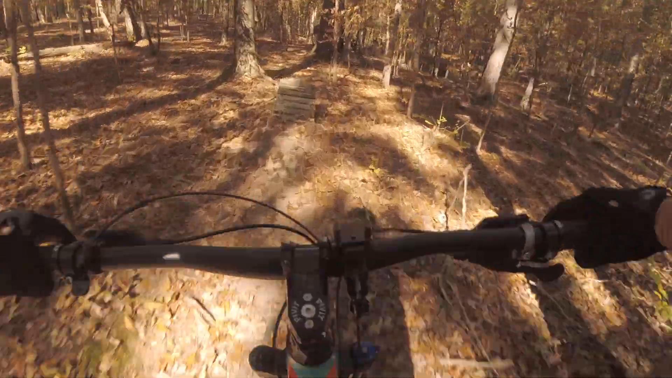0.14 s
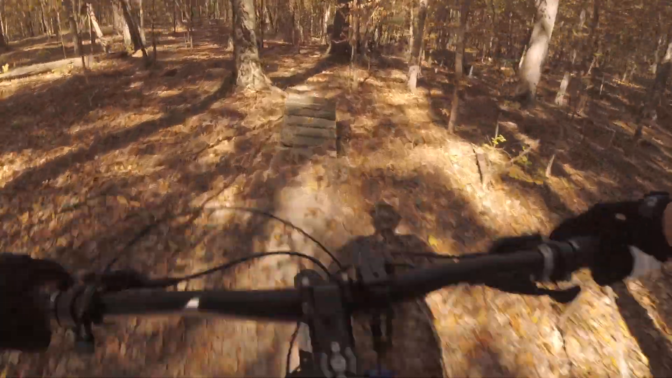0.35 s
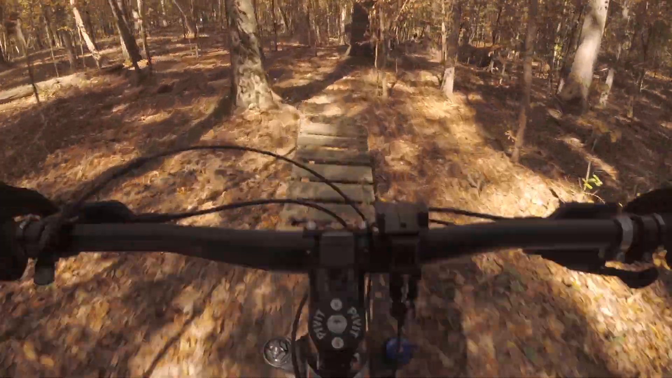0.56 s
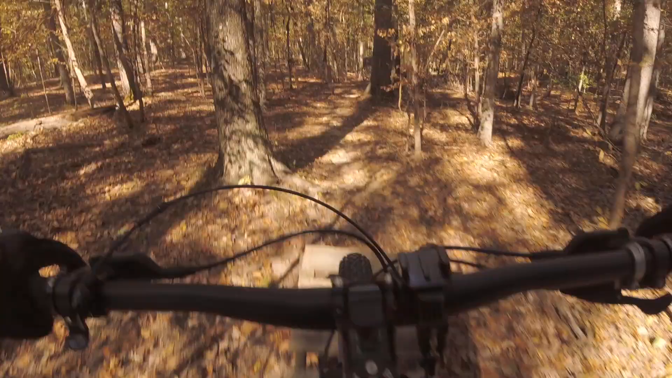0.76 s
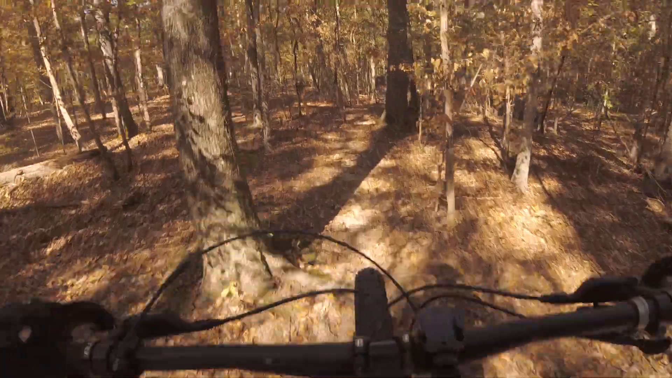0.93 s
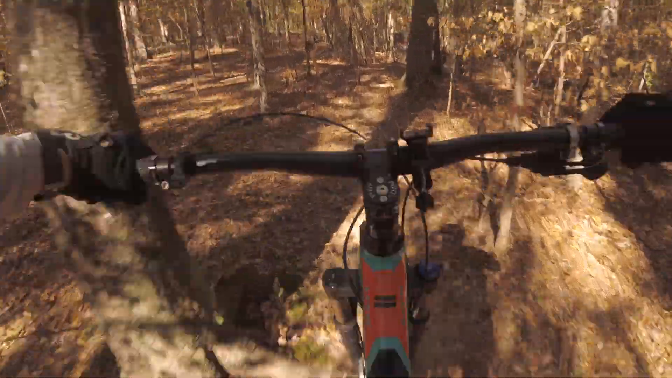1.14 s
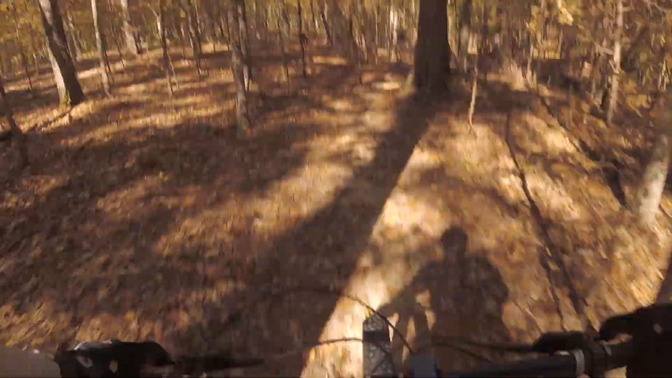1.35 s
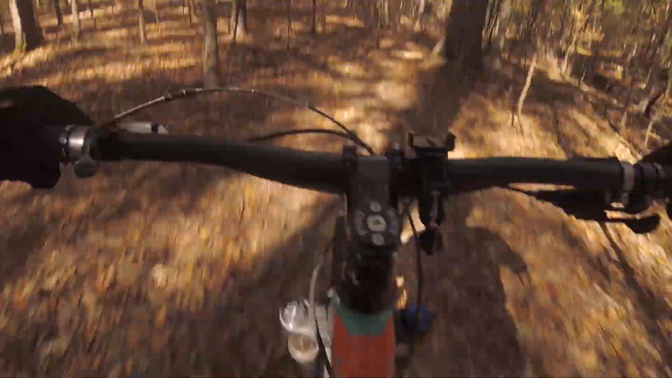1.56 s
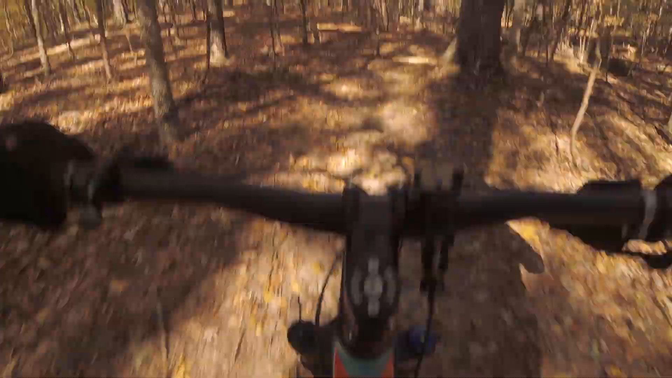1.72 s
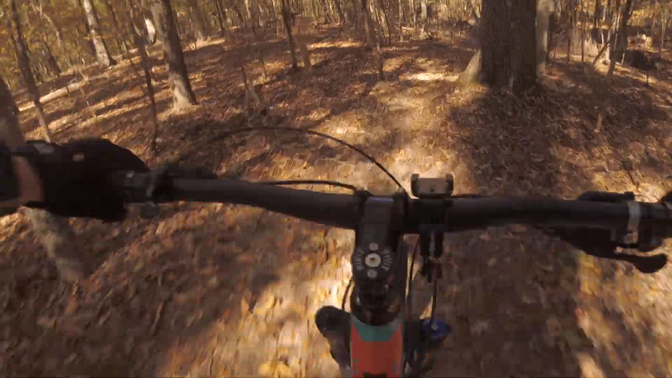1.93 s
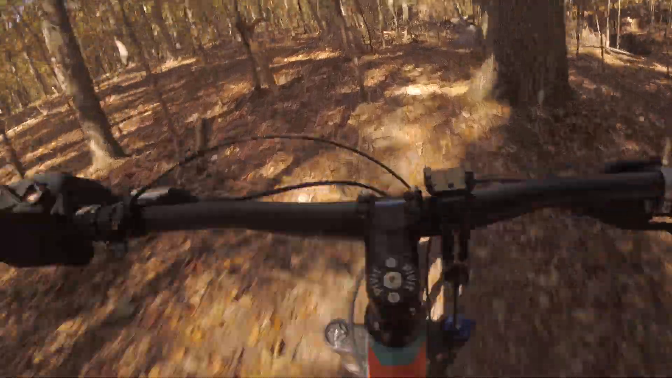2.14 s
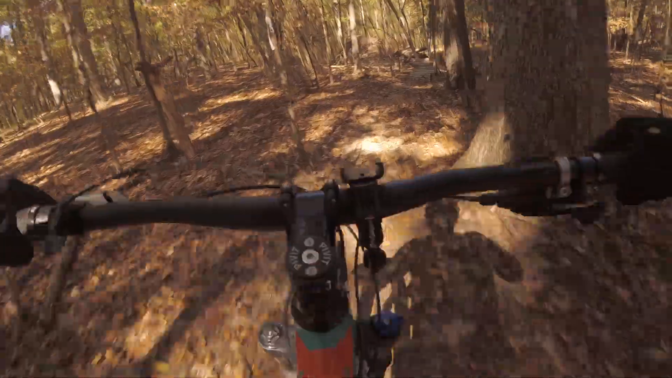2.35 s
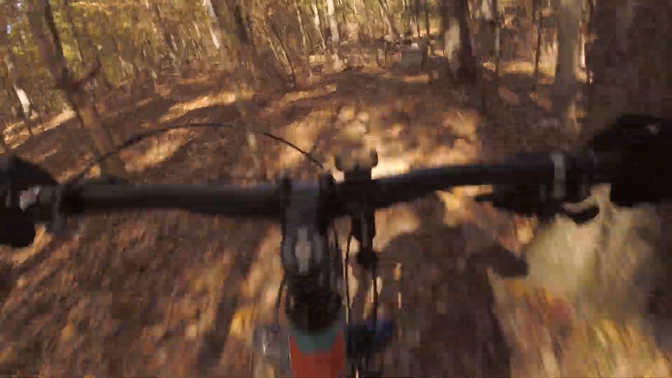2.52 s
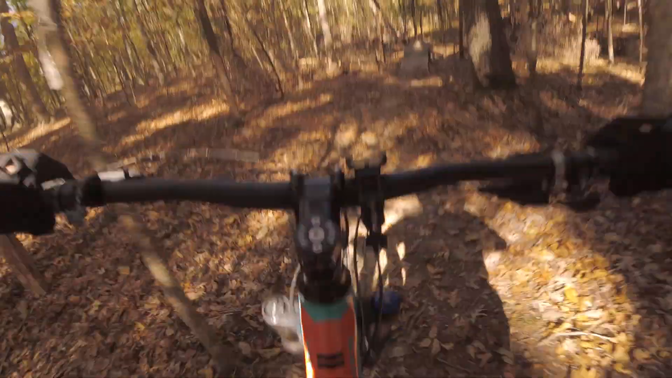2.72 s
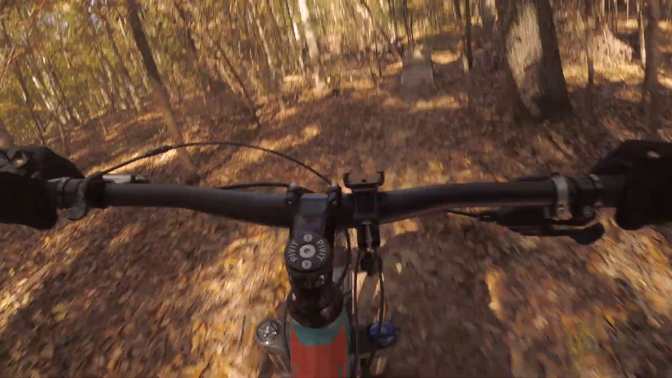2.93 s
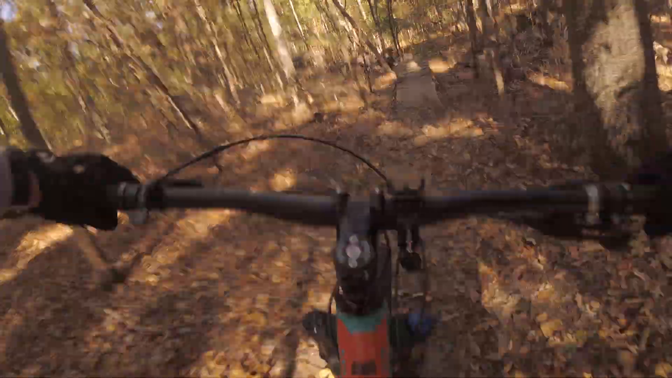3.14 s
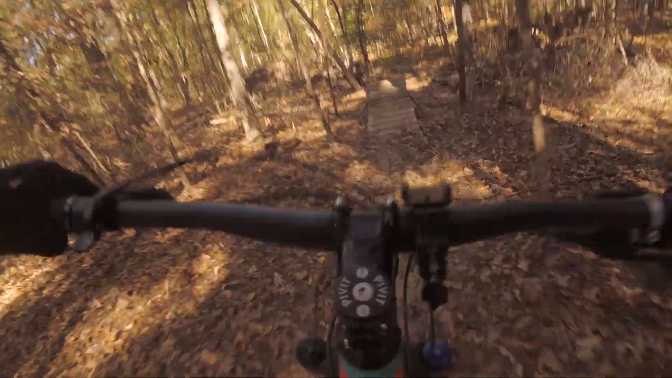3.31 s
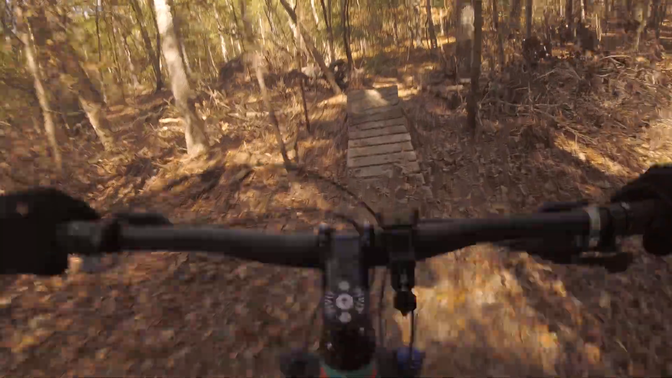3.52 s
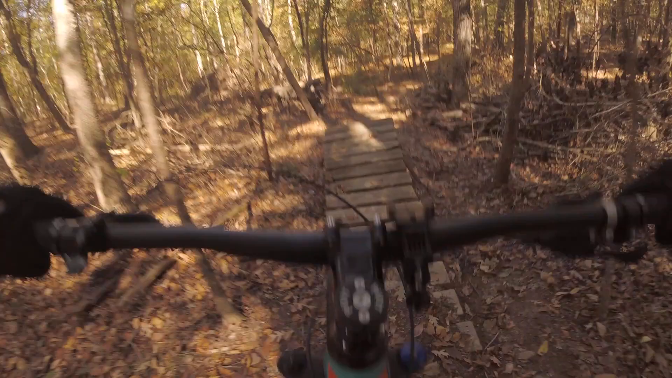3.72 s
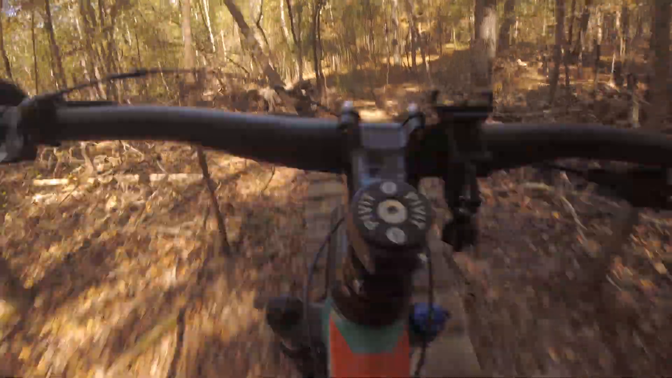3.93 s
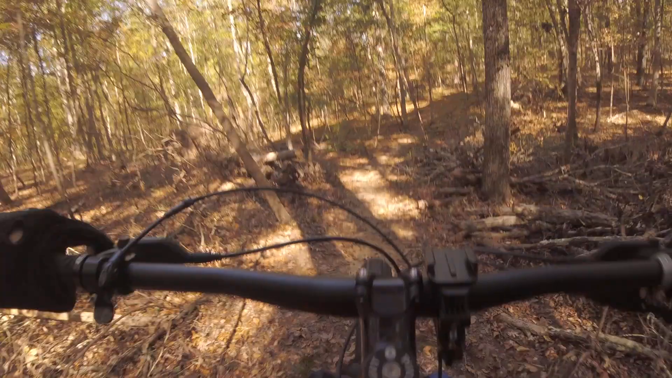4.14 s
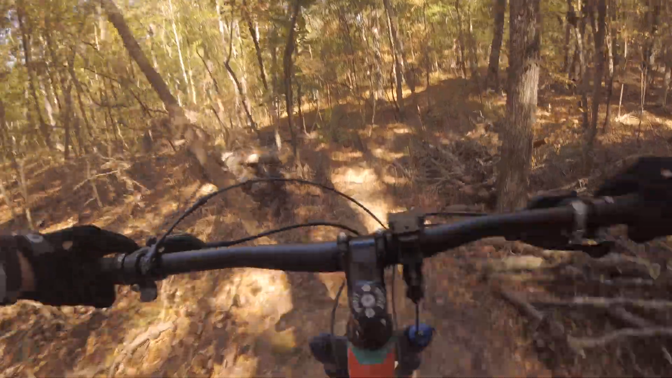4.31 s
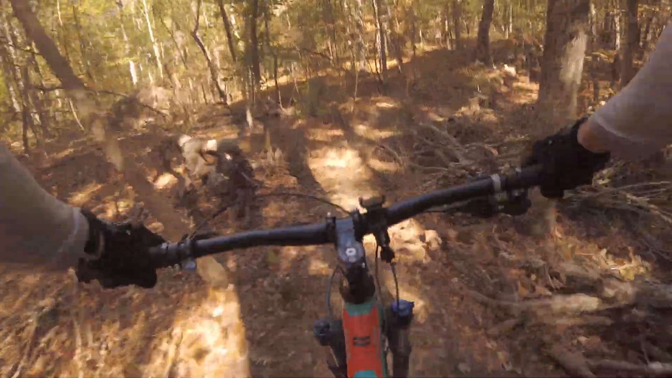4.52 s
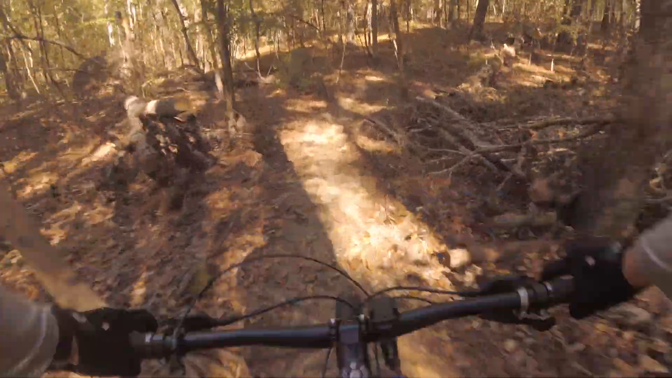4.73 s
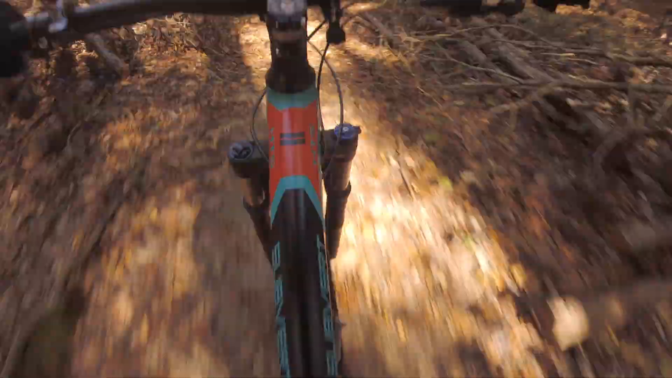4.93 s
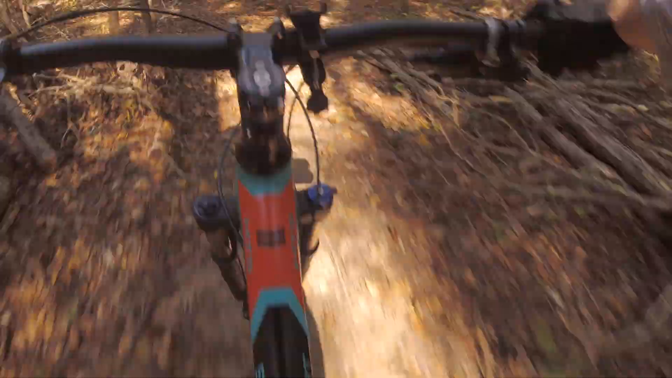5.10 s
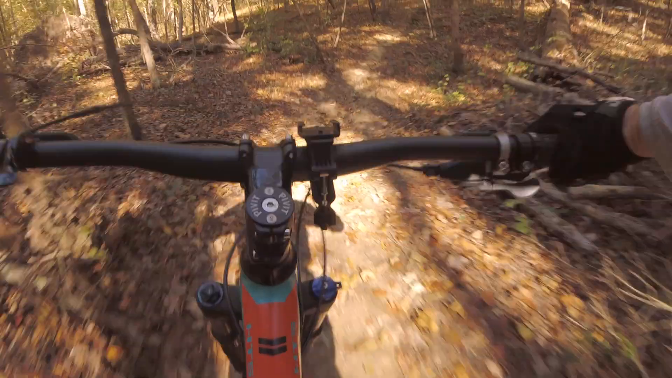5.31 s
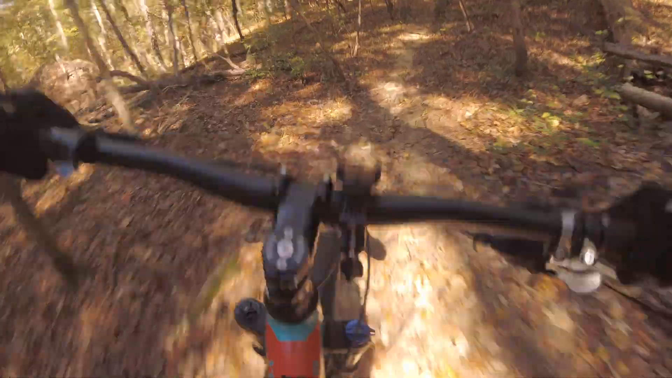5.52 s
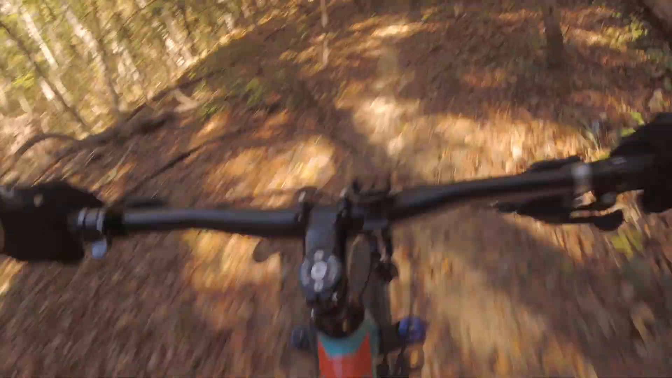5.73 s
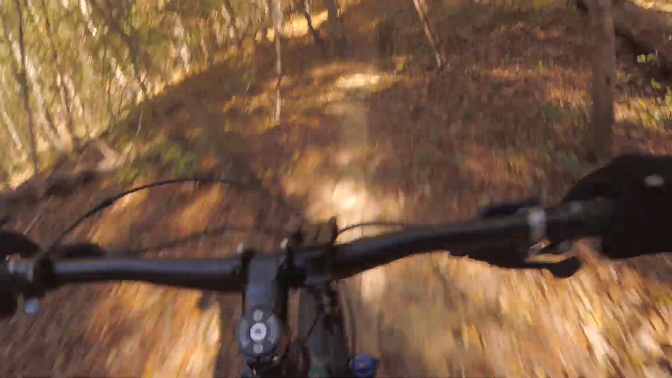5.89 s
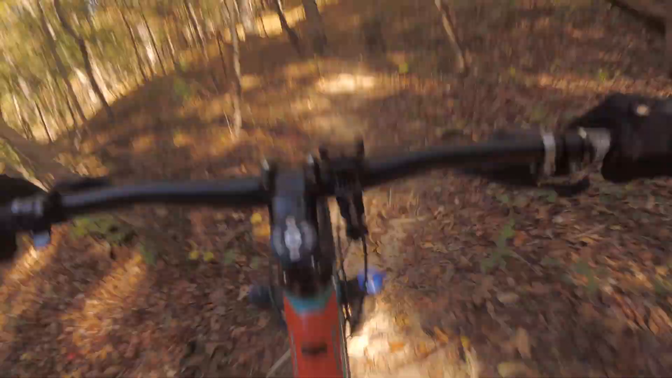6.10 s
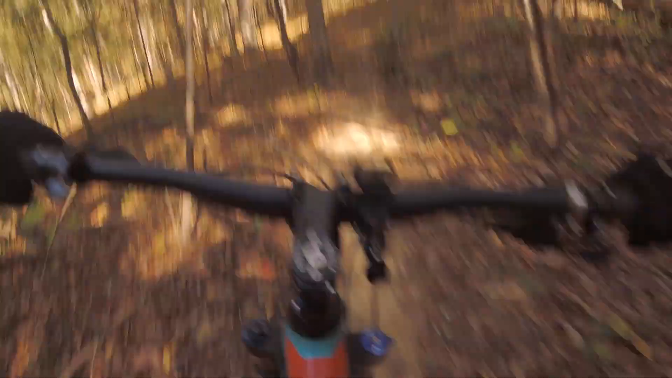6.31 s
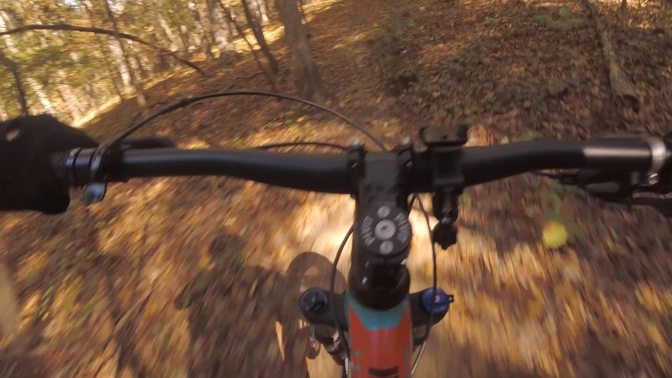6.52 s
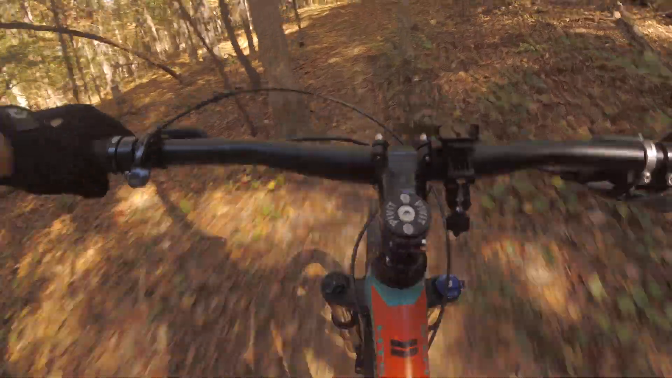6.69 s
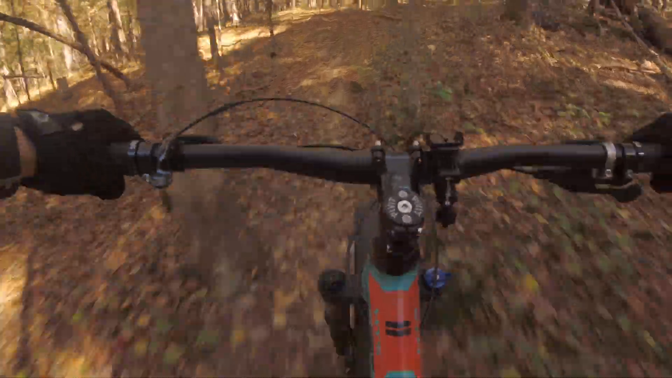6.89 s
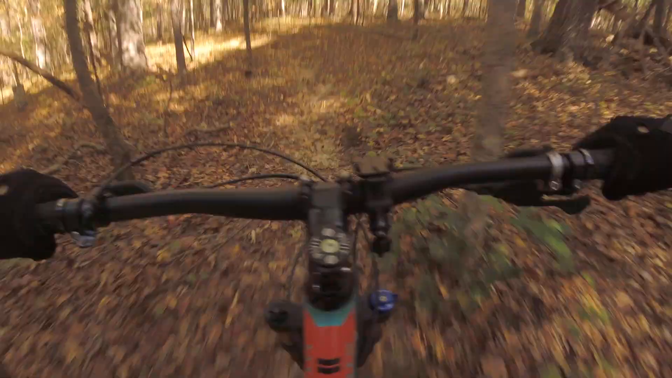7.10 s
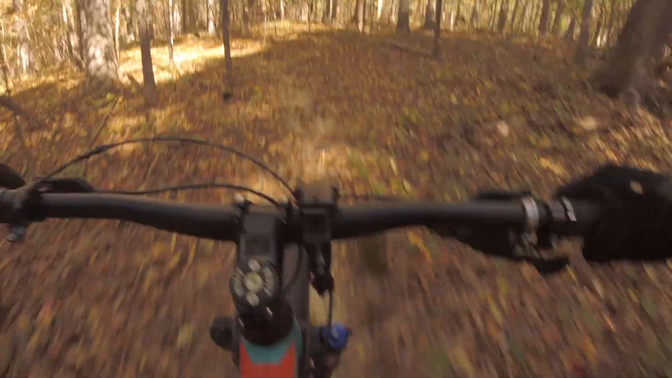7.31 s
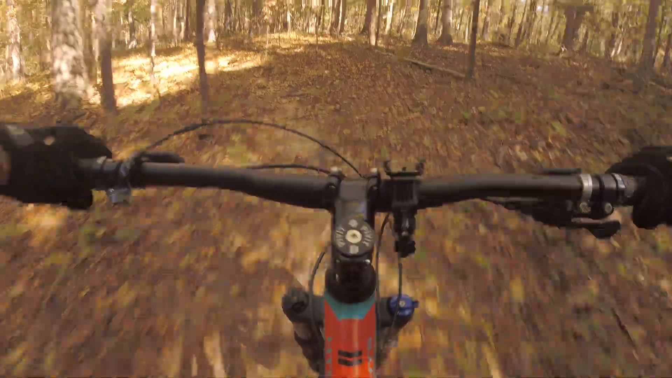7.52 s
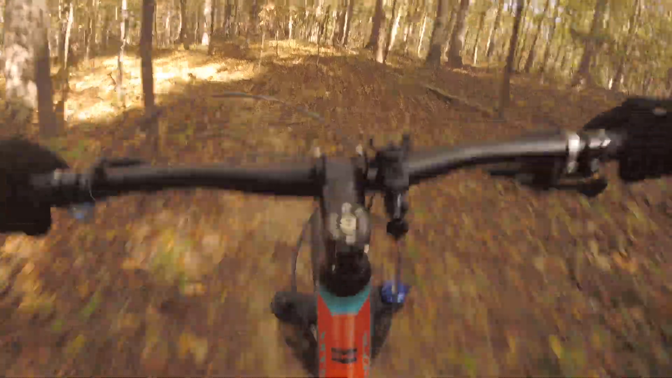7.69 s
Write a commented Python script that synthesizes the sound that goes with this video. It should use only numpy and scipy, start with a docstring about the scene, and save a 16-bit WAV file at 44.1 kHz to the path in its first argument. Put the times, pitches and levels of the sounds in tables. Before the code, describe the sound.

A mountain bike coasts down a leafy forest trail, heard close from the rider's chest. Tyres drum and crush dry leaves while cables and frame rattle over low wind rumble. It crosses a hollow wooden ramp and lands with a thud and chain clink; later a second ramp leads to a longer airborne lull with freewheel ticking, then a heavy wind-blasted landing and more rough rolling.

```python
"""Low wind rumble and a frame rattle open the scene, over tyres drumming and crushing dry leaves.
A mountain bike coasts fast along a leafy trail and two small wooden jumps, heard from the rider's chest.
Wind is shaped noise that overloads the capsule; tyres, leaves and planks are contact-grained noise;
blows ring struck parts. In the air the ground noise fades and leaves the freewheel ticks bare."""
import sys
import numpy as np
from scipy import signal
from scipy.fft import rfft, irfft, next_fast_len
from scipy.io import wavfile
from scipy.ndimage import uniform_filter1d, map_coordinates

SR = 44100
rng = np.random.default_rng(int(sys.argv[2]) if len(sys.argv) > 2 else 0)


def output_pcm(signal):
    """Save a mono or channel-first signal as 16-bit PCM at the path in sys.argv[1].

    Samples are clipped to [-1, 1] before scaling.
    """
    pcm = np.clip(np.atleast_2d(signal).T, -1, 1) * 32767
    wavfile.write(sys.argv[1], SR, np.round(pcm).astype(np.int16))


N = 341775


def amp(db):
    """dB to gain."""
    return 10 ** (np.asarray(db) / 20)


def unit(x):
    """Scaled to rms 1."""
    return x / np.sqrt(np.mean(x ** 2) + 1e-20)


def curves(rows):
    """One value per sample for each column after the time."""
    s, *cols = np.transpose(rows)
    return [np.interp(np.arange(N) / SR, s, c) for c in cols]


def wobble(rate_hz):
    """A smooth random curve, rate_hz knots a second."""
    knots = rng.standard_normal(int(N * rate_hz / SR) + 4)
    return map_coordinates(knots, [np.arange(N) * rate_hz / SR])


def filtered(x, response):
    """x times a response of frequency."""
    m = next_fast_len(N + SR // 2)
    return irfft(rfft(x, m) * response(np.fft.rfftfreq(m, 1 / SR)), m)[..., :N]


def coloured(x, points):
    """x through (Hz, dB) points read on a log axis, rms gain 1 for white noise."""
    f, db = np.transpose(points)
    return filtered(x, lambda hz: unit(amp(np.interp(np.log(hz + 0.11), np.log(f), db, -120, -120))))


def resonant(x, modes, top_hz):
    """x, dulled above top_hz, through (Hz, width Hz, dB) resonances; rms 1."""
    def response(f):
        peaks = sum(amp(db) * 1j * f * w / (c * c - f * f + 1j * f * w) for c, w, db in modes)
        return peaks / (1 + 1j * f / top_hz) ** 2
    return unit(filtered(x, response))


def contacts(per_s, spread_db, life_s, share):
    """A gain above 1 that swells at scattered small contacts of uneven, bounded size."""
    size = np.minimum(rng.exponential(size=N), np.e)
    starts = (rng.random(N) < per_s / SR) * amp(spread_db * size)
    fade = [1, -np.exp(-1 / (life_s * SR))]
    swells = signal.lfilter([1], fade, signal.lfilter([1], fade, starts))
    return 1 + share * unit(swells)


def grit(per_s, spread_db, life_s, share):
    """White noise made grainy by contacts; rms 1."""
    return unit(rng.standard_normal(N) * contacts(per_s, spread_db, life_s, share))


def knocks(count, centre_hz, cycles):
    """Small random knocks of twigs and cables, each a few cycles at its own pitch; rms 1."""
    when, pitch = rng.random(count), rng.standard_normal(count)
    size = np.minimum(rng.exponential(size=count), np.e)
    hz, k = centre_hz * np.exp(.25 * pitch)[:, None], np.arange(SR // 50)
    turns = hz * k / SR
    grains = amp(2.2 * size)[:, None] * turns * np.exp(-turns / cycles) * np.sin(2 * np.pi * turns)
    index = (when * N).astype(int)[:, None] + k
    return unit(np.bincount(index.ravel(), grains.ravel(), minlength=N)[:N])


def patchy(x, depth_db):
    """x with random gain in patches some 1 kHz wide and 50 ms long; rms 1."""
    z = signal.stft(x, nperseg=256)[2]
    field = uniform_filter1d(rng.standard_normal(z.shape), size=7, axis=0)
    field = uniform_filter1d(field, size=17, axis=1)
    return unit(signal.istft(z * amp(depth_db * unit(field)), nperseg=256)[1][:N])


def ring(modes, t, detune):
    """One blow on (Hz, dB, t60 s) modes, each at a new strength and slightly off its pitch."""
    return sum(amp(db + rng.normal(0, 1.1) - 60 * t / t60) * np.sin(2 * np.pi * hz * rng.normal(1, detune) * t)
               for hz, db, t60 in modes)


def add(track, s, sound):
    """Mixes a sound in at time s."""
    part = track[max(round(s * SR), 0):][:len(sound)]
    part += sound[:len(part)]


# Wooden jumps. Each row: on the ramp, take-off and landing in seconds, fade in the air in dB per second,
# deepest fade in dB.
JUMP_TIMES = [(0.68, 0.915, 1.355, 73, 10), (3.893, 4.195, 4.748, 90, 31)]
RAMP_EDGE_S, TOUCH_DOWN_S = 0.064, 0.008  # rolling on and off; landing swell


def jumps():
    """Whether the tyres are on a ramp (0-1), and the dB that ground noise has faded since take-off."""
    t, edge = np.arange(N) / SR, RAMP_EDGE_S
    ramp = sum(np.interp(t, [on, on + edge, off, off + edge], [0, 1, 1, 0]) for on, off, *_ in JUMP_TIMES)
    fade_db = np.zeros(N)
    for _, off, land, rate, deepest in JUMP_TIMES:
        air_s = np.interp(t, [off, land - TOUCH_DOWN_S, land], [0, land - off, 0])
        fade_db -= np.minimum(rate * air_s, deepest)
    return ramp, fade_db


# Wind over time. Each row: time in seconds, heave in dB, buffet in dB; calm over the second jump.
WIND_LEVELS = [(0.0, -15.5, -19.5), (1.4, -12.5, -19.5), (3.2, -8, -20.5), (3.84, -10, -23.5),
               (4.19, -9.5, -19), (4.24, -31, -31.5), (4.74, -20.5, -27.5), (4.78, 3, -25),
               (5.05, -17, -26.5), (6.4, -6, -25), (6.55, -21.5, -13.5), (6.75, -20.5, -20.5),
               (7.0, -16.5, -15.5), (7.75, -7.5, -25)]
# Spectra of slow heaves, faster eddies and air past the rider. Each row: frequency in Hz, density in dB per Hz.
HEAVE_SPECTRUM = [(2, -14), (5, -13), (10, 0.5), (20, -11), (30, -17), (60, -72)]
BUFFET_SPECTRUM = [(15, -61), (30, 1), (60, -2.5), (120, -13), (300, -28.5), (700, -57), (2000, -104)]
HISS_SPECTRUM = [(300, -4), (1000, -10.5), (4000, -19), (8500, -21), (13000, -43)]
HISS_DB, CAPSULE_LIMIT = -56, 0.45


def wind():
    """Slow pressure heaves flatten at the capsule's limit; faster eddies come in lumps."""
    heave_db, buffet_db = curves(WIND_LEVELS)
    gust = wobble(9)
    heave = unit(coloured(rng.standard_normal(N), HEAVE_SPECTRUM))
    buffet = unit(coloured(rng.standard_normal(N), BUFFET_SPECTRUM))
    pressure = amp(heave_db + 2.9 * gust) * heave
    pressure += amp(buffet_db + 2.5 * gust + 2.37 * wobble(14)) * buffet
    flattened = pressure / (1 + np.abs(pressure / CAPSULE_LIMIT) ** 6.8) ** (1 / 6.1)
    return flattened + amp(HISS_DB) * coloured(rng.standard_normal(N), HISS_SPECTRUM)


WHINE_HZ, WHINE_WIDTH_HZ, WHINE_DB = 7580, 45, -63


def whine():
    """One faint narrow band of hiss flickers while the tyres carry load and fades in the air."""
    band = resonant(grit(100, 2.7, 0.0023, 0.45), [(WHINE_HZ, WHINE_WIDTH_HZ, 0)], top_hz=20000)
    return amp(WHINE_DB + 1.2 * wobble(3) + jumps()[1]) * band


# Ratchet. Each row: time in seconds, ticks per second, level in dB; end rows hold outward.
RATCHET = [(4.4, 69, -43.5), (4.75, 71.5, -43.5)]
# Hub shell modes. Each row: frequency in Hz, level in dB, 60 dB decay in seconds.
HUB_MODES = [(2350, 0, .017), (2930, -5, .01), (6380, -10, .015), (7550, -13, .02)]
TICK_AT_S, TICK_SCATTER_DB = 4.467, 2  # the tooth count is aligned to this moment


def freewheel():
    """Pawls drop over the ratchet teeth and ring the hub with a short noise click."""
    rate, level_db = curves(RATCHET)
    teeth = np.cumsum(rate) / SR
    teeth -= teeth[round(TICK_AT_S * SR)]
    out, t = np.zeros(N), np.arange(SR // 40) / SR
    rise = 1 - np.exp(-t / 0.00028)
    for i in np.flatnonzero(np.diff(np.floor(teeth))):
        click = ring(HUB_MODES, t, detune=.018) + .4 * amp(-60 * t / .006) * rng.standard_normal(len(t))
        gain = amp(rng.normal(level_db[i], TICK_SCATTER_DB))
        add(out, i / SR + rng.normal(0, 0.00056), gain * click * rise)
    return out


# Hollow creaks and scrapes on a ramp, just after a take-off and after a landing. Each row: middle in seconds,
# level in dB, half length in seconds, pitch as a ratio to the modes.
HOLLOW_CREAKS = [(0.767, -34.5, 0.049, 0.69), (0.984, -35.5, 0.062, 0.59), (1.513, -32, 0.067, 0.606),
                 (4.192, -23, 0.028, 0.97)]
# Hollow resonances. Each row: frequency in Hz, width in Hz, level in dB.
CREAK_MODES = [(946, 190, 14.5), (1640, 150, 16.5), (2050, 210, -11)]


def creak():
    """Rough slipping through hollow resonances, at its own pitch each time."""
    t, slips, out = np.arange(N) / SR, grit(270, 3, 0.0004, 0.44), np.zeros(N)
    for s, db, half_s, pitch in HOLLOW_CREAKS:
        modes = np.array(CREAK_MODES) * [pitch, pitch, 1]
        out += amp(db) * np.exp(-((t - s) / half_s) ** 4) * resonant(slips, modes, top_hz=3000)
    return out


# Chain hits the stay. Each row: start in seconds, level in dB.
CHAIN_SLAPS = [(1.4148, -13), (4.802, -17.5)]
# Clink modes. Each row: frequency in Hz, level in dB, 60 dB decay in seconds.
CHAIN_MODES = [(6350, 0, .03), (5400, -4, .014), (7400, -7, .014)]


def chain():
    """The slack chain clinks against the frame on hard landings."""
    out, t = np.zeros(N), np.arange(SR // 10) / SR
    for s, db in CHAIN_SLAPS:
        add(out, s, amp(db) * ring(CHAIN_MODES, t, detune=0.0026))
    return out


# Leaves and twigs crushed in a heap. Each row: start in seconds, level in dB, swell time in seconds,
# top octave against the rest in dB.
LEAF_HEAPS = [(0.116, -31.5, 0.005, 3), (0.266, -31, 0.011, 2), (0.339, -32, 0.0061, -6),
              (0.404, -32, 0.012, 0.5), (1.364, -26.5, 0.012, -1), (1.414, -27.5, 0.0048, -5),
              (1.531, -32.5, 0.0095, -3), (1.57, -27.5, 0.0042, 1.5), (1.721, -30, 0.0084, -1),
              (1.975, -36.5, 0.034, -1), (2.419, -26, 0.0043, -4.5), (2.64, -27.5, 0.0023, 3),
              (3.017, -33, 0.018, -6), (3.147, -31.5, 0.0089, -2), (3.437, -33, 0.004, 4),
              (3.625, -28.5, 0.013, -3), (3.778, -27.5, 0.0029, 6.5), (3.865, -27.5, 0.0029, -5),
              (3.996, -25, 0.0065, -5), (4.777, -29.5, 0.0049, 0), (4.8, -35.5, 0.014, -4),
              (4.876, -32, 0.0073, 0), (5.151, -32.5, 0.0053, -1.5), (5.382, -28, 0.0085, -5.5),
              (5.531, -31.5, 0.0072, -0.5), (5.74, -34, 0.0044, 7), (5.781, -33.5, 0.0064, 3),
              (6.302, -33, 0.0078, -1), (6.334, -27.5, 0.003, -4.5), (6.981, -29.5, 0.0025, -2),
              (7.471, -28, 0.0052, -1), (7.518, -29.5, 0.013, -9)]
# Breaking leaves. Each row: frequency in Hz, density in dB per Hz.
CRISP_SPECTRUM = [(2000, 4), (3500, -1.5), (4900, 2.5), (6300, 5), (8500, -2), (10500, -5), (11800, -19),
                  (13000, -19), (15000, -27)]
TOP_OCTAVE_HZ = 7300


def crunches():
    """Many brittle breaks crowd into a burst that swells and thins out; some heaps snap brighter."""
    burst, t = np.zeros((2, N)), np.arange(SR // 4) / SR
    for s, db, swell_s, top_db in LEAF_HEAPS:
        x = t / swell_s
        shape = amp(db) * (x * np.exp(1 - x)) ** 0.49 / (1 + (x / 5) ** 4)
        add(burst[0], s, shape)
        add(burst[1], s, amp(top_db) * shape)
    breaks = coloured(burst * [grit(900, 7.0, 0.00024, 0.8) for _ in burst], CRISP_SPECTRUM)

    def split(hz):
        high = 1 / (1 + (TOP_OCTAVE_HZ / (hz + 1)) ** 6)
        return np.array([1 - high, high])
    return filtered(breaks, split).sum(axis=0)


# Dead knocks through frame and body. Each row: middle in seconds, level in dB, pitch in Hz,
# half length in seconds, puff over the knock in dB.
DEAD_KNOCKS = [(1.349, -14, 60, 0.0055, -11), (1.386, -8, 45, 0.022, -6.5), (4.242, -4.5, 96, 0.0078, -7),
               (4.269, -10.5, 179, 0.0074, -0.5), (4.273, -3.5, 42, 0.011, -14.5),
               (4.327, -3, 62, 0.0066, -9), (4.394, -27.5, 120, 0.011, -4)]
# Dull puff. Each row: frequency in Hz, density in dB per Hz.
KNOCK_PUFF_SPECTRUM = [(100, 2), (250, 2.5), (550, -5.5), (1000, -19.5), (2500, -36)]


def top_out():
    """As the suspension tops out or lands, one low push swells and dies, rough with a dull puff."""
    t, push, rough = np.arange(N) / SR, np.zeros(N), np.zeros(N)
    for s, db, hz, half_s, puff_db in DEAD_KNOCKS:
        bell = amp(db) * np.exp(-((t - s) / half_s) ** 2)
        push += bell * np.sin(2 * np.pi * hz * (t - s))
        rough += bell * amp(puff_db)
    return push + rough * coloured(rng.standard_normal(N), KNOCK_PUFF_SPECTRUM)


# Hollow ramp. Each row: frequency in Hz, width in Hz, level in dB.
PLANK_MODES = [(197, 25, 8.5), (247, 12, 11.5), (560, 230, -14.5), (1030, 73, -21), (1340, 760, -18.5)]
PLANKS_DB = -24


def planks():
    """Tyre knobs and slat gaps rumble the hollow ramp."""
    rumble = resonant(grit(80, 7.0, 0.0057, 0.55), PLANK_MODES, top_hz=2520)
    return amp(PLANKS_DB + 1.1 * wobble(24.8)) * jumps()[0] * rumble


# Blows on the tyres from slats, roots and landings. Each row: start in seconds, level in dB, pitch in Hz.
TYRE_BLOWS = [(0.611, -13.5, 247), (0.748, -17.5, 272), (0.877, -8.5, 246), (0.915, -17, 243),
              (0.986, -14.5, 201), (3.055, -18.5, 177), (3.525, -20.5, 308), (3.568, -16.5, 275),
              (3.927, -16, 222), (4.089, -15.5, 246), (4.155, -13.5, 260), (4.75, -20, 134),
              (5.303, -20, 255), (5.548, -16, 259), (7.163, -19.5, 256), (7.634, -13, 268),
              (7.723, -16.5, 270)]
# Dull burst of a soft blow. Each row: frequency in Hz, density in dB per Hz.
PUFF_SPECTRUM = [(60, 11.5), (300, 5), (700, -12.5), (2500, -38)]
THUMP_T60_S, THUMP_RISE_S = .085, .012
PUFF_T60_S, PUFF_RISE_S, PUFF_DB = 0.045, 0.0031, 5.5


def thumps():
    """A soft blow rings the tyre for a few cycles, with a dull puff on top."""
    out, puff, t = np.zeros(N), np.zeros(N), np.arange(SR // 5) / SR
    tone = amp(-60 * t / THUMP_T60_S) * (1 - np.exp(-t / THUMP_RISE_S))
    burst = amp(-60 * t / PUFF_T60_S) * (1 - np.exp(-t / PUFF_RISE_S))
    for s, db, hz in TYRE_BLOWS:
        add(out, s, amp(db) * tone / tone.max() * np.sin(2 * np.pi * hz * t))
        add(puff, s, amp(db) * burst)
    return out + amp(PUFF_DB) * coloured(puff * rng.standard_normal(N), PUFF_SPECTRUM)


# Jolts that rattle cables and frame. Each row: start in seconds, level in dB, ring pitch in Hz.
FRAME_JOLTS = [(0.026, -14, 1070), (0.094, -25, 1140), (0.737, -21, 2730), (0.751, -18.5, 2780),
               (0.784, -23, 2400), (1.146, -23.5, 976), (1.348, -21, 1960), (1.367, -13, 633),
               (1.382, -13.5, 1610), (1.414, -13, 1350), (1.429, -22, 1330), (2.043, -17.5, 1104),
               (2.141, -15.5, 1000), (2.488, -19.5, 1140), (2.547, -16, 1035), (2.616, -13.5, 1035),
               (2.681, -24, 1050), (2.722, -18.5, 470), (3.057, -20, 1640), (3.439, -24, 1080),
               (3.446, -10, 2360), (3.516, -21, 1200), (3.617, -21.5, 1400), (3.638, -22, 1250),
               (3.783, -16.5, 974), (3.838, -20, 2680), (4.158, -19, 516), (4.748, -25.5, 840),
               (4.775, -23.5, 1530), (4.802, -17, 1460), (5.467, -19, 925), (5.53, -19.5, 1610),
               (5.552, -23, 2900), (5.603, -19.5, 1810), (5.65, -14.5, 1210), (5.676, -17.5, 980),
               (5.707, -17, 2700), (5.744, -17.5, 935), (5.809, -18.5, 1310), (6.123, -18, 900),
               (6.144, -17.5, 810), (6.452, -23.5, 572), (6.817, -23, 2150), (6.982, -22, 1145),
               (7.287, -23, 2650), (7.597, -23, 1090), (7.627, -17.5, 1190)]
JOLT_T60_S, JOLT_RISE_S = 0.031, .0013
JOLT_RING_CYCLES = 24  # the struck part's ring falls 60 dB in this many cycles
FRAME_HZ, FRAME_DB = 584, -3  # the frame's own low ring, weaker under high jolts
RATTLE_Q, RATTLE_DB, RATTLE_WIDE = 0.92, 3, 0.24  # band round the ring pitch; gain left wide


def jolts():
    """Each jolt is a gritty burst in the frame, coloured by a brief ring of the part that was struck."""
    out, t = np.zeros(N), np.arange(SR // 5) / SR
    rise = 1 - np.exp(-t / JOLT_RISE_S)
    # sharp contacts reach higher than rolling
    frame = [(hz, db + 2.0 * np.log2(hz / 1000)) for hz, db in TREAD_SPECTRUM]
    rattle = np.pad(coloured(grit(900, 4, 0.0004, 0.5), frame), (0, len(t)))
    for s, db, hz in FRAME_JOLTS:
        shape = amp(db - 60 * t / JOLT_T60_S) * rise
        burst = shape * rattle[round(s * SR):][:len(t)]
        near_pitch = signal.lfilter(*signal.iirpeak(hz, RATTLE_Q, SR), burst)
        add(out, s, RATTLE_WIDE * burst + amp(RATTLE_DB) * near_pitch)
        ring_shape = amp(db - 60 * t * hz / JOLT_RING_CYCLES) * rise
        overtone = np.sin(2 * np.pi * rng.uniform(1.3, 2.1) * hz * t)
        add(out, s, ring_shape * (np.sin(2 * np.pi * hz * t) + .5 * overtone))
        frame_ring = np.sin(2 * np.pi * FRAME_HZ * rng.normal(1, 0.045) * t)
        add(out, s, amp(FRAME_DB) * FRAME_HZ / hz * shape * frame_ring)
    return out


# Ground under the tyres. Each row: time in seconds, roughness as tread in dB, leaf cover over it in dB.
TRAIL_SURFACE = [(0.0, -36, -3.5), (0.54, -32, -5.5), (0.9, -28.5, -12.5), (1.36, -27, -10.5),
                 (1.44, -29, -9.5), (1.57, -30.5, -6.5), (1.68, -37.5, -9), (2.6, -32.5, -7),
                 (3.09, -37, -9.5), (3.7, -32.5, -6.5), (4.1, -34, -11), (4.75, -30, -12.5),
                 (4.93, -34, -9), (5.24, -40, -8), (5.41, -33, -9.5), (5.7, -30, -8), (6.7, -40.5, -5),
                 (7.3, -33.5, -7), (7.75, -31, -5)]
# Air in the tyre. Each row: frequency in Hz, width in Hz, level in dB.
DRUM_MODES = [(261, 21, 15.5), (216, 66, 4)]
# Tread on the ground and rustling leaves. Each row: frequency in Hz, density in dB per Hz.
TREAD_SPECTRUM = [(300, 9), (420, 3), (610, 0), (780, -9.5), (1000, -3), (1600, -6), (2000, -12),
                  (2600, -8.5), (3500, -19), (5000, -28)]
LEAF_SPECTRUM = [(1500, 3.5), (3000, 5.5), (3900, -2), (4900, 4), (6300, 3), (8500, -2), (10500, -8.5),
                 (11800, -20.5), (15200, -22.5)]
DRUM_OVER_DB, DRUM_GROWS = 3.5, 1.07  # drum over the tread at mean roughness; swing against the tread's
AIR_DRUM, AIR_LEAVES = 1.03, 0.6  # share of the fade in the air that reaches drum and leaves


def tyres():
    """Rough ground drums the air in the tyres, works the tread and stirs dry leaves, all in shared lumps."""
    rough_db, cover_db = curves(TRAIL_SURFACE)
    fade_db = jumps()[1]
    mean_db = rough_db.mean()
    tread_db = rough_db + fade_db
    drum_db = mean_db + DRUM_OVER_DB + DRUM_GROWS * (rough_db - mean_db) + AIR_DRUM * fade_db
    leaves_db = rough_db + cover_db + AIR_LEAVES * fade_db
    lumps, stones = wobble(30), contacts(90, 4.4, 0.002, 0.67)
    drum = amp(drum_db + 0.4 * lumps) * resonant(grit(65, 5.0, 0.0039, 0.24), DRUM_MODES, top_hz=890)
    rolling = coloured(patchy(stones * rng.standard_normal(N), depth_db=1.5), TREAD_SPECTRUM)
    rolling += amp(-13) * knocks(count=350, centre_hz=1370, cycles=1.4)
    clods = amp(-10.5) * knocks(count=160, centre_hz=506.0, cycles=3.4)
    tread = amp(tread_db + 2.12 * lumps) * (rolling + clods)
    stirred = patchy(stones ** 0.82 * grit(300, 3.1, 0.00097, 0.29), depth_db=2.0)
    leaves = amp(leaves_db + 1.04 * lumps) * coloured(stirred, LEAF_SPECTRUM)
    single_breaks = coloured(knocks(count=900, centre_hz=5200, cycles=.7), LEAF_SPECTRUM)
    return drum + tread + leaves + amp(leaves_db - 11.5) * single_breaks


def scene():
    """Everything reaches one microphone."""
    air = wind() + whine()
    bike = freewheel() + creak() + chain() + top_out() + jolts()
    ground = crunches() + planks() + thumps() + tyres()
    return (air + bike + ground)[None]


TOP_HZ = 15250


def record(dry):
    """The converter clips softly at full scale and keeps nothing above its band limit."""
    clipped = dry / (1 + np.abs(dry) ** 8) ** (1 / 8)
    return filtered(clipped, lambda hz: hz < TOP_HZ)


dry = scene()
out = record(dry)
output_pcm(out)
```